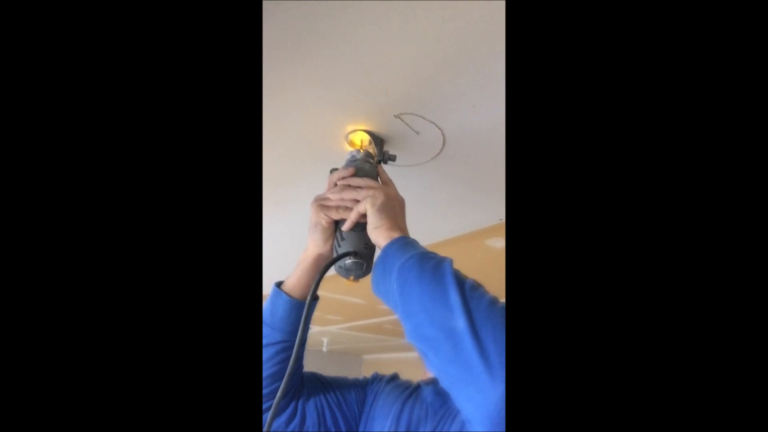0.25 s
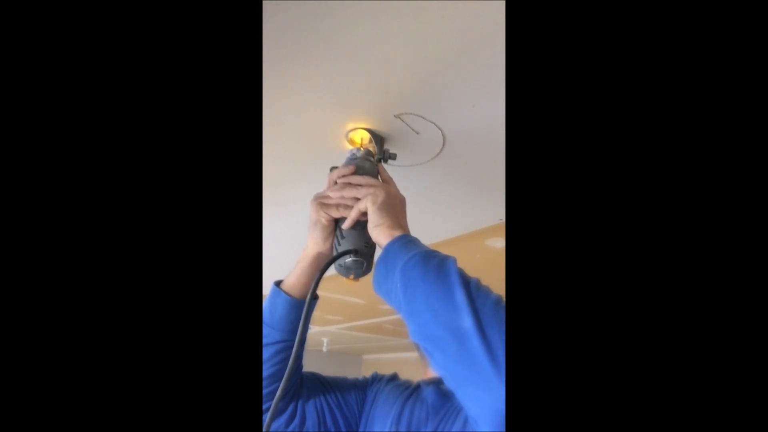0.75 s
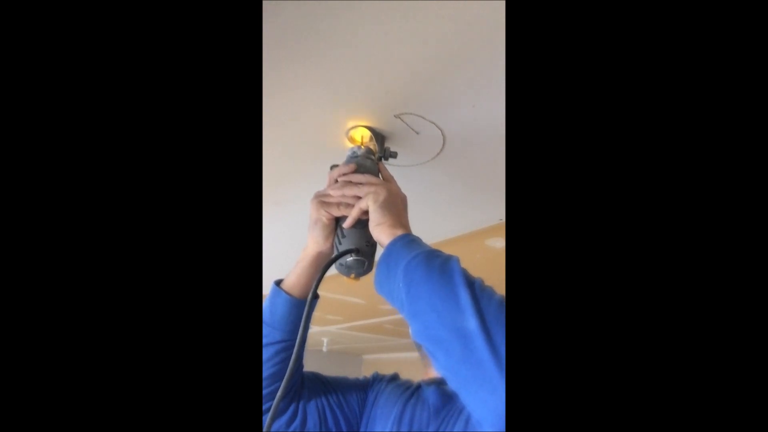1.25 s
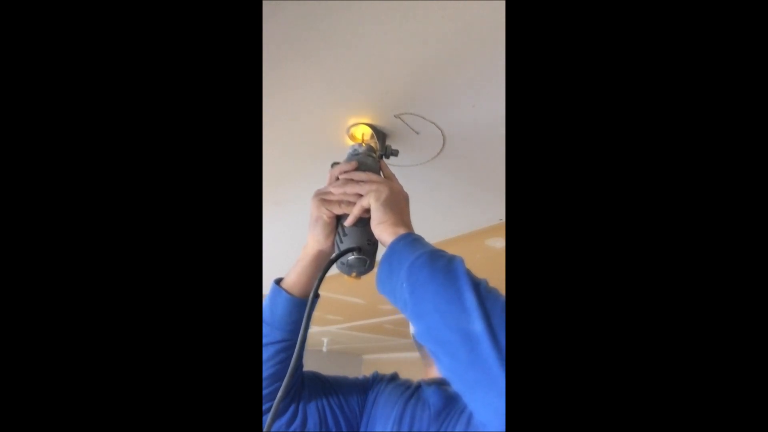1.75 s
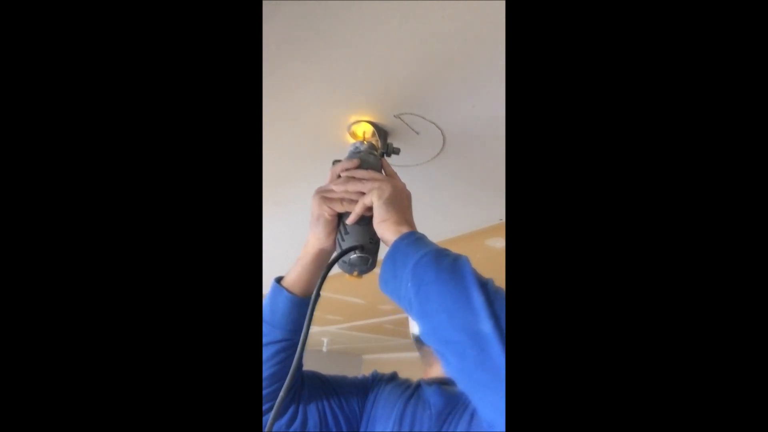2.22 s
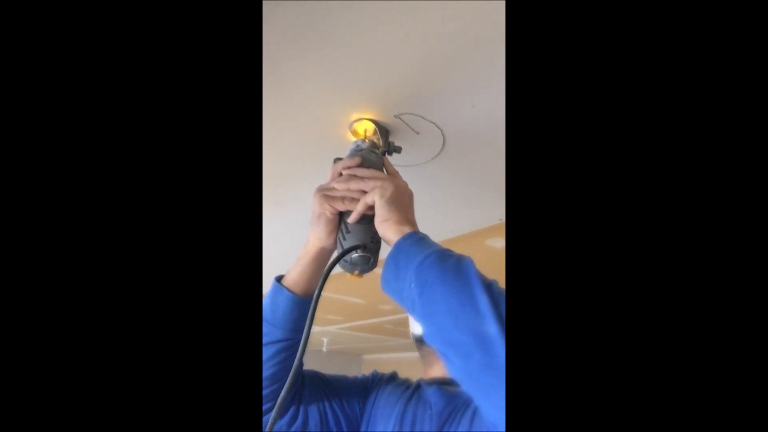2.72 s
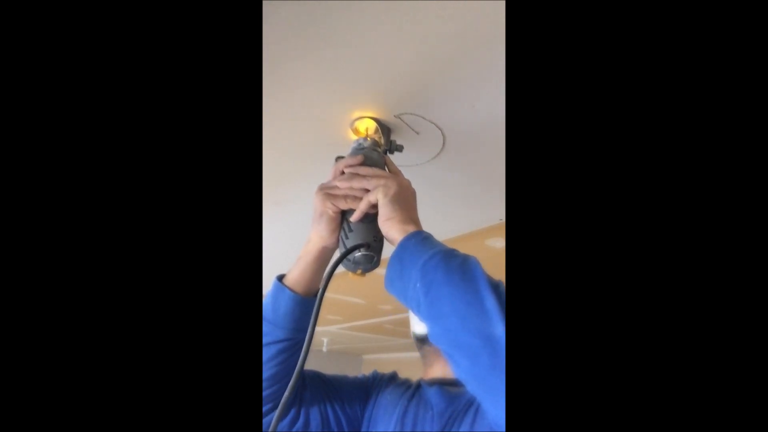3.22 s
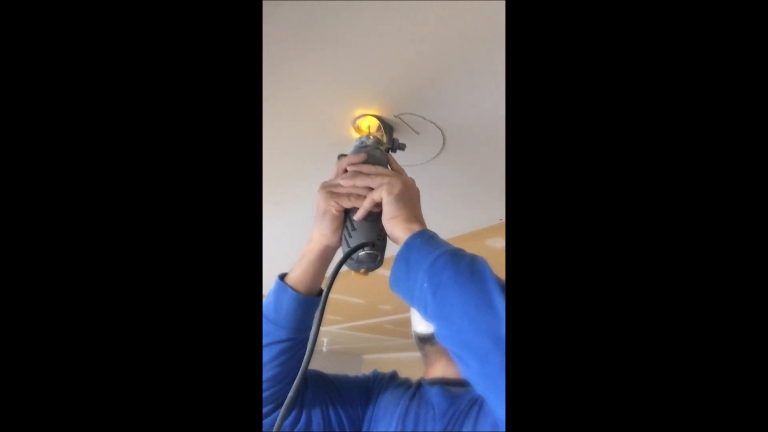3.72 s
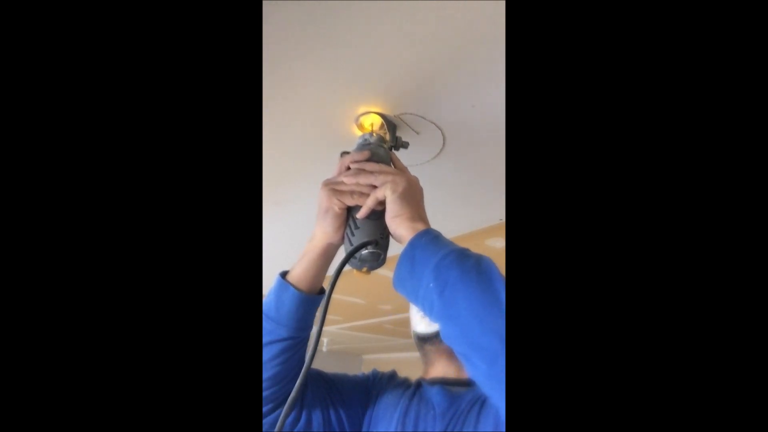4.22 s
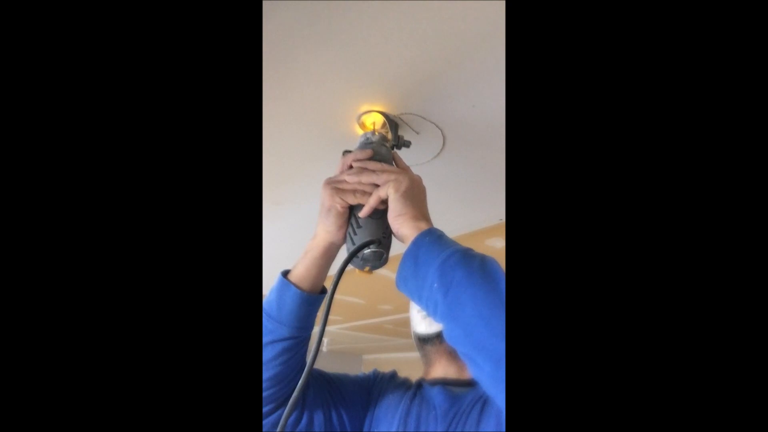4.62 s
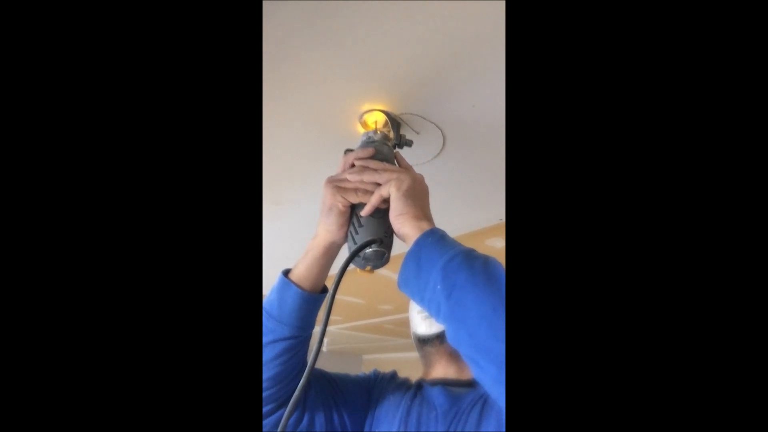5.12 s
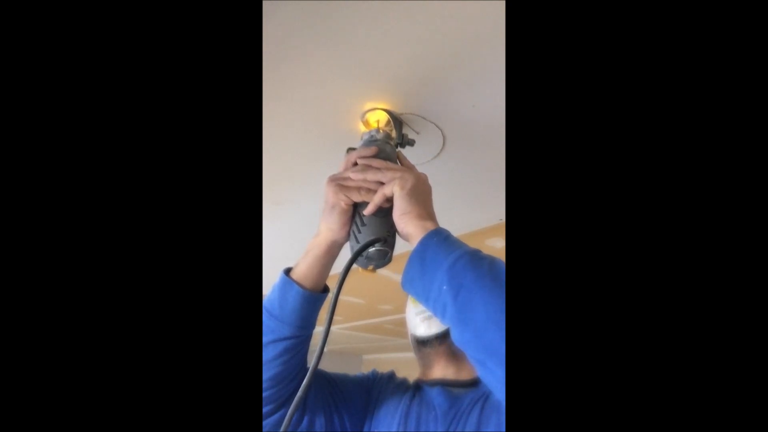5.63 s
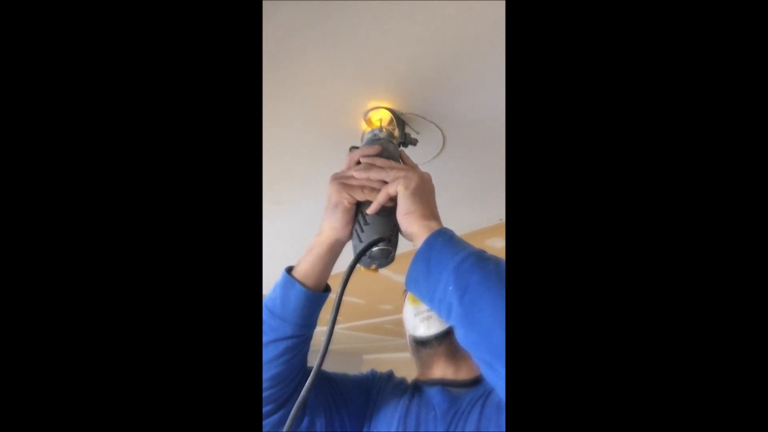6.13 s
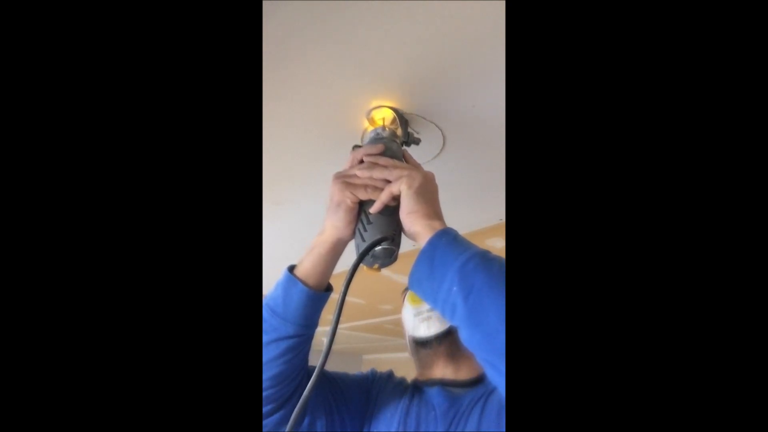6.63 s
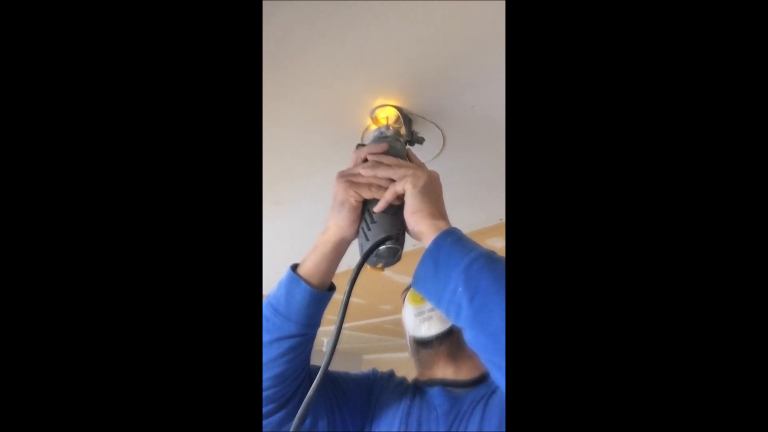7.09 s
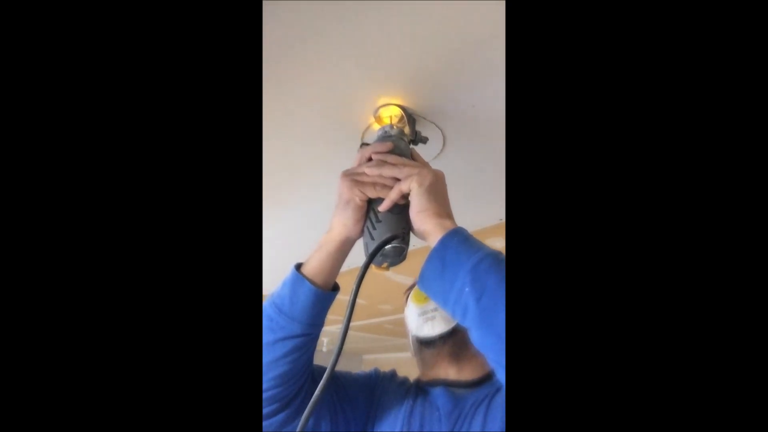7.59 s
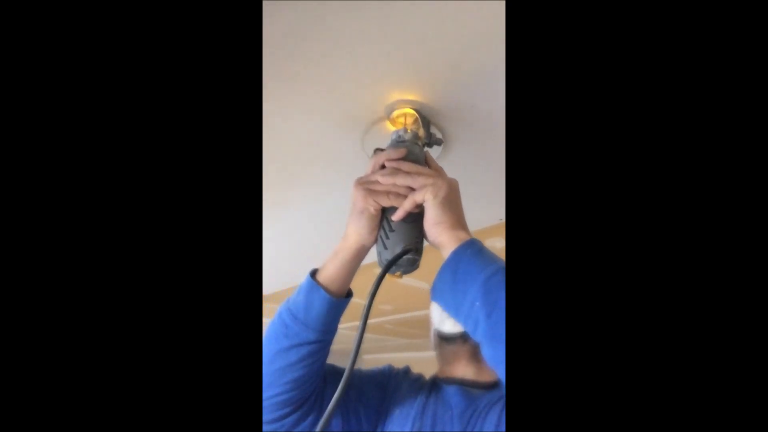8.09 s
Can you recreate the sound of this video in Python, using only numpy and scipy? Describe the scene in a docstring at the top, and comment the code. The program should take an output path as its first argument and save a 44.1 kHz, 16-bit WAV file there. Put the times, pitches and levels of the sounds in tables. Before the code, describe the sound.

Steady electric motor whine with gritty gypsum scraping overhead, a deeper rasping bite, brief squawking knocks, a wobbling tone, and a late rise in pitch.

```python
"""First a steady shaft whine near 375 Hz: a rotary tool cuts a round hole in a garage's drywall ceiling.
Behind it lie mains hum, rolling-ball tones from the bearing, cooling air (shaped noise) and board rumble.
Noise grains strongest once a turn make the scrape; a two-second deeper bite adds a broad rasp.
Then ringing knocks mark the catches, a wobble chops the whine, and the loosening disc rattles.
Near the end the tool eases off: the hum drops away, the motor speeds up. Heard through a phone."""
import sys
import numpy as np
from scipy import signal
from scipy.fft import rfft, irfft
from scipy.io import wavfile

SR = 44100
rng = np.random.default_rng(int(sys.argv[2]) if len(sys.argv) > 2 else 0)


def int16_out(signal):
    """Quantize to a 16-bit WAV file."""
    q = np.round(np.clip(np.atleast_2d(signal).T, -1, 1) * 32767)
    wavfile.write(sys.argv[1], SR, q.astype(np.int16))


N = 368220
TIME = np.arange(N) / SR


def undb(db):
    """Decibels to gain."""
    return 10 ** (np.asarray(db) / 20)


def unit(x):
    """Scale to an rms of one."""
    return x / np.sqrt(np.mean(x ** 2))


def curves(table):
    """One value per sample for each column of a time table."""
    s, *columns = np.transpose(table)
    return [np.interp(TIME, s, column) for column in columns]


def ramp(start, length):
    """Rise from zero to one in a straight line."""
    return np.clip((TIME - start) / length, 0, 1)


def walk(rate):
    """Smooth chance of spread one, changing about rate times a second."""
    hz = np.arange(N // 2 + 1) * SR / N
    return unit(irfft(rfft(rng.standard_normal(N)) / (1 + (hz / rate) ** 2), N))


def colour(x, spectrum):
    """Give a sound a spectrum of (Hz, dB) points, joined over log frequency; rms one."""
    hz, db = np.transpose(spectrum)
    bins = np.arange(1, N // 2 + 2) * SR / N
    gain = undb(np.interp(np.log(bins), np.log(hz), db))
    return unit(irfft(rfft(x) * gain, N))


def ring(x, modes):
    """Pass a sound through parallel resonances with steep skirts; rms one."""
    bins = np.arange(1, N // 2 + 2) * SR / N
    response = 0
    for hz, width, db in modes:
        detuning = (bins ** 2 - hz ** 2) / (2 * bins * width)
        response = response + undb(db) / (1 + 1j * detuning) ** 2
    return unit(irfft(rfft(x) * response, N))


def tone(phase, scatter, rate):
    """A line of rms about one; scatter is the part that wanders in level and phase."""
    wander = scatter * (walk(rate) + 1j * walk(rate)) / np.sqrt(2)
    line = np.exp(1j * (phase + 2 * np.pi * rng.random()))
    return np.sqrt(2 / (1 + scatter ** 2)) * np.imag((1 + wander) * line)


def grains(shaft, swing, grit_db):
    """Crumbling gypsum: dense noise ticks of uneven size, strongest once a turn."""
    size_db = grit_db * np.clip(walk(500), -1.6, 1.6)
    return rng.standard_normal(N) * (1 + swing * np.cos(shaft)) * undb(size_db)


GARAGE_T60_S = 0.19  # reverberation time


def garage(x, wet_db):
    """The place: bare garage walls add a short diffuse tail, from 4 ms on."""
    t = TIME[:SR]
    tail = rng.standard_normal(SR) * undb(-60 * t / GARAGE_T60_S) * (t > .004)
    tail = tail / np.sqrt(np.sum(tail ** 2))
    return x + undb(wet_db) * signal.fftconvolve(x, tail)[:N]


def nearby(x, echo_db, count):
    """Ceiling, hands and arms send back echoes 2-12 ms late, which ripple the spectrum; rms one."""
    lags = (SR * rng.uniform(.002, .012, count)).astype(int)
    return unit(x + undb(echo_db) * sum(np.roll(x, lag) for lag in lags))


# mains hum, following how firmly the tool is pressed to the board: (time [s], level [dB])
HUM_LEVEL = [(0, -46.5), (1.45, -50.5), (1.6, -46), (2.35, -46), (2.95, -54.5), (3.3, -44), (3.7, -49.5),
             (5.2, -54), (5.8, -50), (7.45, -47), (7.78, -51), (7.88, -78), (8.35, -81)]


def hum(mains):
    """The field coils hum into the board at twice the mains rate, with one harmonic."""
    hum_db, = curves(HUM_LEVEL)
    lines = tone(mains, scatter=.06, rate=8) + undb(-7) * tone(2 * mains, scatter=.1, rate=5)
    return undb(hum_db + .9 * walk(4)) * lines


# bites into the board: (start [s], end [s], depth [0-1])
BITE_TIMES = [(1.545, 3.62, 0.79), (4.26, 4.5, 0.18), (5.7, 6.15, 0.02), (7.8, 8.4, 0.15)]
BITE_ATTACK_S, BITE_RELEASE_S = .04, .018


def bite_depth():
    """How deep the bit is in the board, 0-1: each bite takes hold, stays and lets go."""
    return sum(depth * (ramp(start, BITE_ATTACK_S) - ramp(end, BITE_RELEASE_S))
               for start, end, depth in BITE_TIMES)


# spectrum of the cooling air: (frequency [Hz], relative level [dB per Hz])
AIR_SPECTRUM = [(2000, -7), (3100, 2), (3500, -8.5), (3850, 6.5), (4200, -3), (4500, -13), (5050, -27),
                (5800, -19), (6500, -3), (7350, 6), (7800, 3.5), (8400, 3), (9500, -6), (10700, -16),
                (11500, -14), (12600, -24.5), (14200, -25), (15100, -20), (15700, -30)]
# faint whistling of the air in the vents: (frequency [Hz], width [Hz], relative level [dB])
VENT_RESONANCES = [(3796, 164, 0), (5360, 20, -10), (6060, 42, -16.5)]
AIR_DB, BITE_AIR_DB = -40, 2.5  # light cutting; added by a full bite


def air(shaft, bite):
    """The fan blows noise through the vents, which resonate faintly."""
    air_db = AIR_DB + BITE_AIR_DB * bite
    rush = nearby(colour(grains(shaft, swing=.08, grit_db=1.1), AIR_SPECTRUM), echo_db=-18, count=5)
    vents = undb(-14.5) * ring(rng.standard_normal(N), VENT_RESONANCES)
    return undb(air_db + .3 * walk(25)) * (rush + vents)


# rumble of the board before bites add to it: (time [s], level [dB])
RUMBLE_LEVEL = [(0, -43.5), (0.7, -45.5), (1.3, -42), (4.4, -41), (5.4, -43.5), (6.3, -43), (7.55, -41),
                (7.9, -45.5), (8.35, -51.5)]
# spectrum of the shaken board: (frequency [Hz], relative level [dB per Hz])
BOARD_SPECTRUM = [(20, -54), (55, -12), (130, -3.5), (180, -31), (260, -7.5), (330, 3), (480, 3.5),
                  (620, 5), (720, -3), (860, -0.5), (1200, 1), (1700, -12.5), (3000, -45)]
# the board's own ringing: (frequency [Hz], width [Hz], relative level [dB])
BOARD_RESONANCES = [(246, 12, 3), (547, 18, 5.5), (599, 80, -23), (855, 90, 6), (1050, 84, 4.5)]
BITE_BOARD_DB = 1.5  # added by a full bite


def board(shaft, bite):
    """The grains of the cut shake the board, which rumbles and rings at its own modes."""
    board_db = curves(RUMBLE_LEVEL)[0] + BITE_BOARD_DB * bite
    rumble = colour(grains(shaft, swing=.46, grit_db=1), BOARD_SPECTRUM)
    ringing = undb(-6) * ring(grains(shaft, swing=.18, grit_db=0), BOARD_RESONANCES)
    return undb(board_db + 2.04 * walk(11)) * (rumble + ringing)


# as the cut closes the disc rattles more and more, until the bit leaves it
DISC_START_S, DISC_END_S, DISC_FADE_S, DISC_DB = 6, 7.72, .092, -42  # mean level at the loosest
# ringing of the loose disc: (frequency [Hz], width [Hz], relative level [dB])
DISC_RESONANCES = [(493, 32, 4), (594, 62, -4)]


def disc(shaft):
    """The nearly freed disc of board rings under the grains, louder as it loosens."""
    looseness = ramp(DISC_START_S, DISC_END_S - DISC_START_S) - ramp(DISC_END_S, DISC_FADE_S)
    rattle = ring(grains(shaft, swing=.2, grit_db=3), DISC_RESONANCES)
    return undb(DISC_DB + 2.1 * walk(12)) * looseness * rattle


# spectrum of the scraping bit: (frequency [Hz], relative level [dB per Hz])
SCRAPE_SPECTRUM = [(400, -52), (950, -16.5), (1250, 1), (1450, -7), (1750, 1.5), (2050, 7), (2220, 2.5),
                   (2350, -2), (2600, -7), (2850, -9), (3200, -10), (3500, -15), (4200, -39), (5000, -68)]
SCRAPE_DB, BITE_SCRAPE_DB = -33.5, -1.5  # light cutting; added by a full bite


def scrape(shaft, bite):
    """The bit scrapes gypsum once a turn, a little softer in a deep bite."""
    scrape_db = SCRAPE_DB + BITE_SCRAPE_DB * bite
    rub = nearby(colour(grains(shaft, swing=.44, grit_db=1), SCRAPE_SPECTRUM), echo_db=-15.5, count=5)
    return undb(scrape_db + 1.2 * walk(16)) * rub


# spectrum of the deep rasp: (frequency [Hz], relative level [dB per Hz])
RASP_SPECTRUM = [(60, -40), (180, -63), (250, 2), (400, -51), (600, -0.5), (1000, 18.5), (1300, -4),
                 (1900, 15.5), (2600, -6.5), (4300, 1.5), (5300, -16.5), (6800, -5), (9000, -52.5),
                 (14000, -29)]
# drumming of the board in a deep bite: (frequency [Hz], width [Hz], relative level [dB])
DRUM_RESONANCES = [(245, 28, 6), (534, 24, 10)]
RASP_DB = -30  # broad part, in a full bite


def rasp(shaft, bite):
    """A deep bite tears broad noise from the gypsum and makes the board drum."""
    crumbs = grains(shaft, swing=.1, grit_db=-1.5)
    drumming = undb(-16.5) * ring(crumbs, DRUM_RESONANCES)
    return undb(RASP_DB) * bite * (colour(crumbs, RASP_SPECTRUM) + drumming)


def cutting(shaft, bite):
    """Board and scrape carry the garage's tail; rasp and air stay dry."""
    near = board(shaft, bite) + scrape(shaft, bite)
    return garage(near, wet_db=-4.5) + rasp(shaft, bite) + air(shaft, bite)


# brief dips: (centre time [s], nominal length [s], treble depth [dB])
DIP_TIMES = [(.627, .018, 9), (.731, .012, 10), (.944, .015, 7), (1.117, .012, 11), (1.498, .015, 11),
             (1.584, .014, 14), (1.905, .013, 10), (1.947, .013, 14), (2.023, .028, 26), (2.094, .014, 11),
             (2.223, .014, 9), (2.629, .014, 12), (2.902, .026, 24), (3.281, .028, 32), (3.378, .015, 9),
             (3.781, .013, 13), (4.145, .011, 13), (4.231, .015, 13), (4.57, .018, 11), (5.643, .048, 27),
             (6.172, .015, 9), (7.005, .02, 8), (7.472, .014, 9)]


def dips(x):
    """The level dips briefly, most of all in the treble."""
    dip_db = 0
    for s, length, db in DIP_TIMES:
        corners = s + length * np.array([-.7, -.3, .3, .7])
        dip_db = dip_db + np.interp(TIME, corners, [0, db, db, 0])
    low = signal.sosfiltfilt(signal.butter(5, 2100, fs=SR, output="sos"), x)
    return low * undb(-.6 * dip_db) + (x - low) * undb(-dip_db)


# the bit catches and squawks: (start time [s], nominal length [s], level [dB])
CATCH_TIMES = [(4.266, .02, -17), (4.298, .04, -22), (4.357, .02, -30), (4.386, .02, -21),
               (4.452, .03, -23), (4.518, .032, -23), (4.578, .02, -32), (7.32, .04, -33), (7.8, .025, -32),
               (8.09, .04, -36)]
# what a catch rings: (frequency [Hz], width [Hz], relative level [dB])
BIT_RESONANCES = [(1220, 290, -10), (1520, 150, 10), (1850, 370, 7), (2130, 390, 9.5)]


def catches(shaft):
    """When the bit catches it knocks once a turn, unevenly, and rings with the tool's body."""
    jitter = .087 * walk(42)
    knocks = np.exp(12 * (np.cos(shaft + jitter) - 1)) * undb(1.9 * walk(200))
    push = np.zeros(N)
    for s, length, db in CATCH_TIMES:
        corners = [s, s + .003, s + length * .7, s + length * 1.2]
        push += undb(db) * np.interp(TIME, corners, [0, 1, .85, 0])
    return garage(push * ring(knocks, BIT_RESONANCES), wet_db=-9)


# the bearing's middle tone, before a small trim: (time [s], level [dB])
RACE_LEVEL = [(0.0, -38), (1.0, -43.5), (2.4, -30.5), (2.9, -39.5), (3.34, -34), (4.5, -44), (5.56, -56),
              (6.56, -41.5), (8.34, -43)]
# swells of the upper tone to a squeal: (peak time [s], half length [s], level [dB])
SQUEAL_TIMES = [(1.274, 0.07, -32), (7.577, 0.13, -29.5)]
BALL_PASS = 3.598  # balls passing one point of the race in a turn
LOWER_TONE_DB, UPPER_TONE_DB, TOP_TONE_DB = -40, -45.5, -52  # in light cutting
BITE_BEARING_DB = 4.5  # added to these three by a full bite


def bearing(shaft, mains, bite):
    """Balls rolling over the race give tones one shaft rate apart; the upper ones are rough."""
    middle_db, = curves(RACE_LEVEL)
    race = BALL_PASS * shaft
    load = undb(BITE_BEARING_DB * bite)
    squeal = sum(undb(db) * np.exp(-((TIME - s) / half) ** 2) for s, half, db in SQUEAL_TIMES)
    lower = undb(LOWER_TONE_DB) * load * tone(race, scatter=.19, rate=13)
    middle = undb(middle_db + .5) * tone(race + shaft, scatter=.17, rate=21)
    upper = (undb(UPPER_TONE_DB) * load + squeal) * tone(race + 2 * shaft, scatter=2, rate=32)
    top = undb(TOP_TONE_DB) * load * tone(race + 3 * shaft, scatter=.95, rate=5.3)
    return (lower + middle + upper + top) * (1 + .11 * np.cos(mains))


# the whine fades as the tool moves under the ceiling: spread, and changes a second
FADE_DEPTH, FADE_HZ = 1, 6.9


def fading():
    """Sound and ceiling echo interfere: a level of rms one with plateaus and sudden notches."""
    echo = FADE_DEPTH * (walk(FADE_HZ) + 1j * walk(FADE_HZ))
    return unit(np.tanh(np.abs(1 + echo) / 2))


# wobble of the bit in its slot: (time [s], mean rate [wobbles per s], depth [0-1])
SLOT_WOBBLE = [(0, 20, .02), (3.2, 20, .03), (3.75, 21, .34), (4.7, 22, .3), (5.2, 26, .34), (5.6, 32, .3),
               (6.1, 56, .18), (6.3, 58, .07), (8.35, 58, .06)]


def wobble_flutter():
    """The wobbling bit chops the level, at an uneven rate, around a mean of one."""
    wobble_hz, depth = curves(SLOT_WOBBLE)
    wobble = np.cumsum(wobble_hz * (1 + .12 * walk(18.3))) / SR
    return 1 + depth * (np.pi * np.abs(np.sin(np.pi * wobble)) - 2)


# shaft harmonics 1, 2, 3 (main whine of the cut), and 4 and 5 alike; each is trimmed by under 1 dB # and, all
# but the second, moved by its flutter or fading: (time [s], level [dB])
FIRST_LEVEL = [(0.0, -25.0), (1.48, -23), (1.58, -20.5), (2.34, -20), (2.52, -25), (3.1, -25.5),
               (4.32, -43.0), (4.62, -33), (4.94, -36.5), (5.1, -31.5), (6.02, -28.5), (6.16, -38.5),
               (7.48, -32.5), (7.58, -42), (7.76, -34), (7.86, -48.0), (8.16, -32.5), (8.34, -43.5)]
SECOND_LEVEL = [(0.0, -38), (0.52, -39), (0.76, -47.5), (1.14, -36.5), (1.64, -47), (3.36, -31), (4.2, -57),
                (4.76, -38.5), (7.16, -37.5), (8.34, -50.5)]
THIRD_LEVEL = [(0, -42), (.66, -31.5), (1.26, -37.5), (1.48, -27), (1.7, -34), (1.86, -29), (2.44, -34.5),
               (2.6, -25.5), (3.15, -26), (3.58, -28.5), (3.7, -36), (3.98, -29), (4.25, -35.5),
               (4.42, -27.5), (5.2, -30.5), (5.7, -41), (6.3, -45), (7.5, -37.5), (8.35, -43.5)]
UPPER_LEVEL = [(0, -41), (1.28, -37.5), (1.76, -29), (3.15, -36.5), (3.62, -33), (3.98, -42), (4.25, -36),
               (4.31, -29.5), (5.1, -42.5), (5.4, -39), (6.4, -46.5), (7.2, -41), (7.35, -35.5), (7.8, -35),
               (8.35, -46)]
# weaker harmonics: (multiple of the shaft rate, level before the shared gain [dB])
WEAK_HARMONICS = [(6, -43), (7, -48.5), (8, -51.5), (9, -57), (10, -51.5), (11, -56.5), (16, -95),
                  (17, -90), (21, -54)]
# shared gain of the weaker harmonics: (time [s], level [dB])
WEAK_GAIN = [(0, -4), (2, 2), (4.3, 3), (5.3, -3.5), (7.6, 3.5), (8.35, -7)]
# shaft harmonics within reach of the nose's resonances: (multiple of the shaft rate)
NOSE_HARMONICS = [18, 19, 20, 21]
# the nose sings when a high harmonic meets it: (frequency [Hz], width [Hz], relative level [dB])
NOSE_RESONANCES = [(7328, 110, 5), (7560, 610, -9)]
WHISTLE_ORDER = 40  # cycles a turn


def whine(shaft, mains):
    """Shaft harmonics; mains pulses of torque shake all but the top whistle."""
    levels = (FIRST_LEVEL, SECOND_LEVEL, THIRD_LEVEL, UPPER_LEVEL)
    first_db, second_db, third_db, upper_db = (curves(table)[0] for table in levels)
    first = undb(first_db - .23) * wobble_flutter() * tone(shaft, scatter=.12, rate=8.4)
    second = undb(second_db + .1) * tone(2 * shaft, scatter=.42, rate=19)
    third = undb(third_db + .8) * fading() * tone(3 * shaft, scatter=.21, rate=42)
    fourth = undb(upper_db + .75) * fading() * tone(4 * shaft, scatter=.46, rate=29)
    fifth = undb(upper_db + .5) * fading() * tone(5 * shaft, scatter=.18, rate=16)
    weak = sum(undb(db) * tone(k * shaft, scatter=2.5, rate=24) for k, db in WEAK_HARMONICS)
    weak = undb(curves(WEAK_GAIN)[0]) * weak
    nose_drive = sum(tone(k * shaft, scatter=4.5, rate=58) for k in NOSE_HARMONICS)
    nose = undb(-44) * ring(nose_drive, NOSE_RESONANCES)
    whistle = undb(-53) * tone(WHISTLE_ORDER * shaft, scatter=.22, rate=14)
    higher = second + third + fourth + fifth + weak + nose
    return first * (1 + .051 * np.cos(mains)) + higher * (1 + .05 * np.cos(mains)) + whistle


# motor speed: (time [s], shaft rate [turns per s])
MOTOR_SPEED = [(0, 373.8), (0.3, 374.2), (0.55, 376.2), (0.75, 376.4), (1.17, 373.6), (1.6, 377.0),
               (2.25, 377.0), (2.9, 380.4), (3.15, 382.3), (4.15, 381.6), (4.35, 380.1), (5.1, 380.9),
               (5.72, 379.1), (6.1, 373.0), (6.33, 371.6), (7.1, 370.1), (7.8, 370.7), (8.07, 378.3),
               (8.35, 383.2)]


def scene():
    """One shaft drives the whine, the bearing and the cut; the bite shapes bearing and cut."""
    shaft_hz, = curves(MOTOR_SPEED)
    shaft = 2 * np.pi * np.cumsum(shaft_hz) / SR
    mains = 2 * np.pi * 120 * TIME  # twice the mains rate
    bite = bite_depth()
    cut = dips(cutting(shaft, bite) + disc(shaft))
    mix = hum(mains) + cut + catches(shaft) + bearing(shaft, mains, bite) + whine(shaft, mains)
    return mix[None]


TOP_HZ = 15750


def record(dry):
    """The microphone: a phone cuts the deepest bass and the top."""
    thin = signal.sosfilt(signal.butter(3, 38, "high", fs=SR, output="sos"), dry)
    return signal.sosfilt(signal.ellip(10, .2, 80, TOP_HZ, fs=SR, output="sos"), thin)


dry = scene()
out = record(dry)
int16_out(out)
```